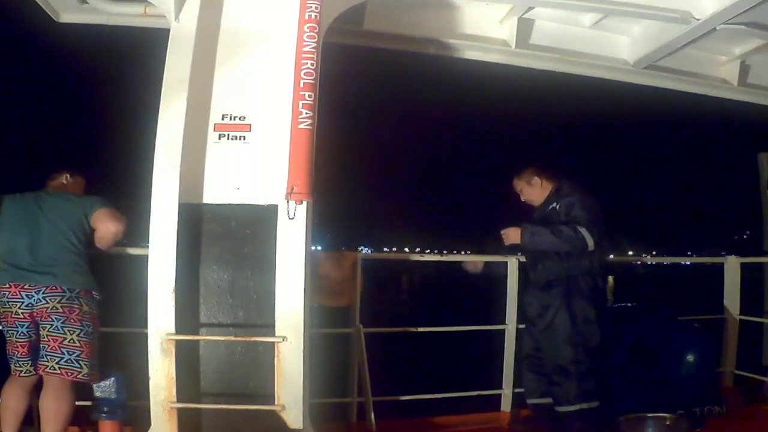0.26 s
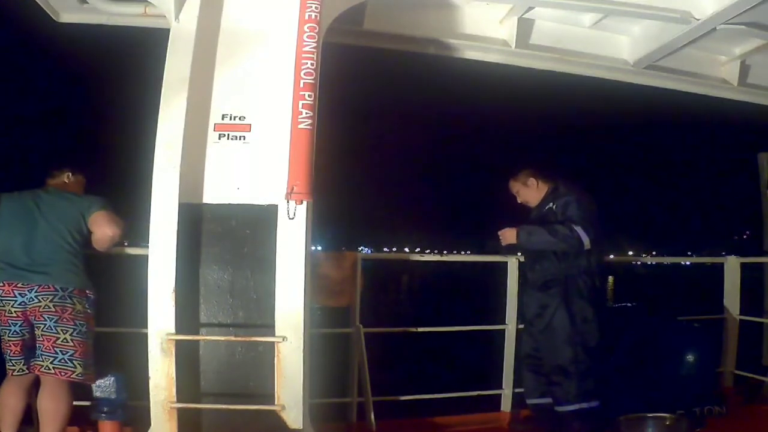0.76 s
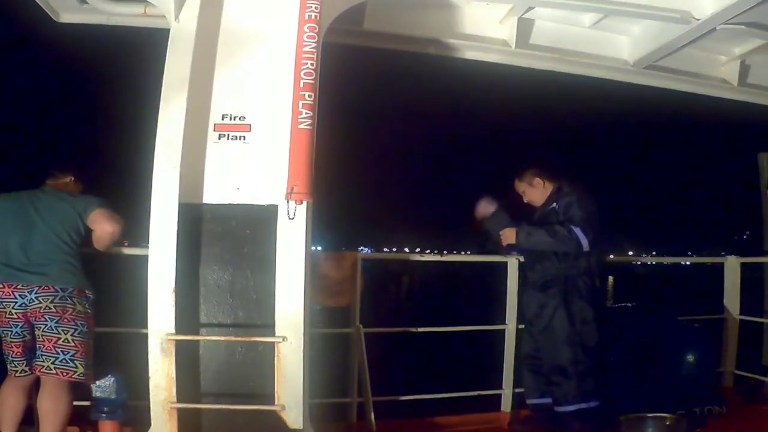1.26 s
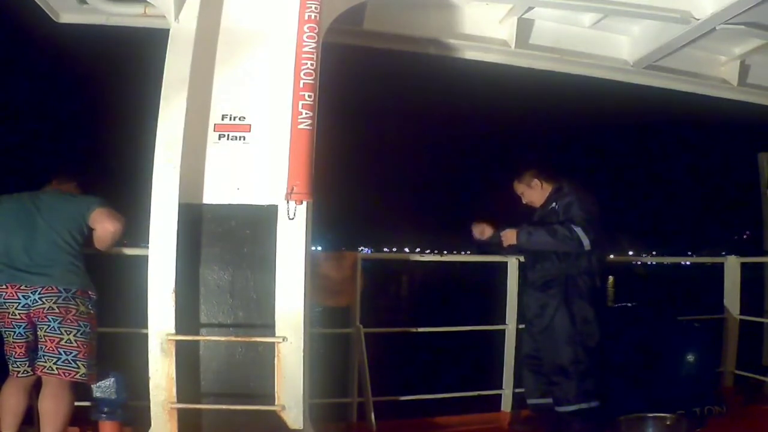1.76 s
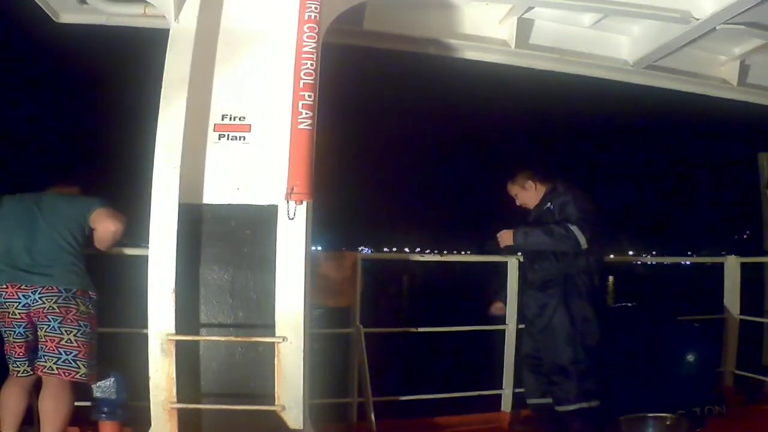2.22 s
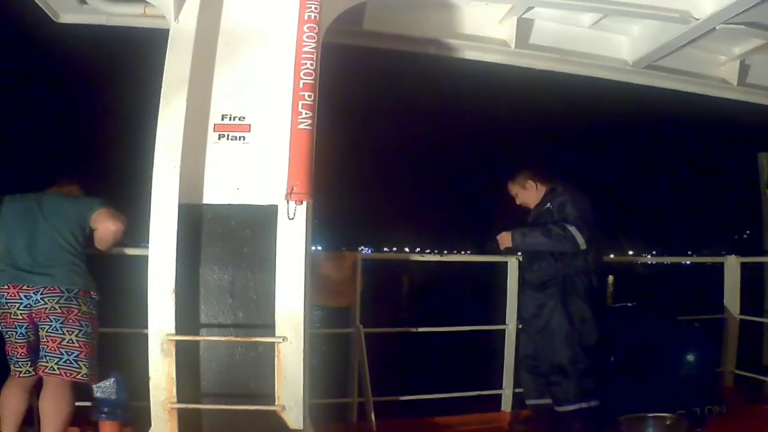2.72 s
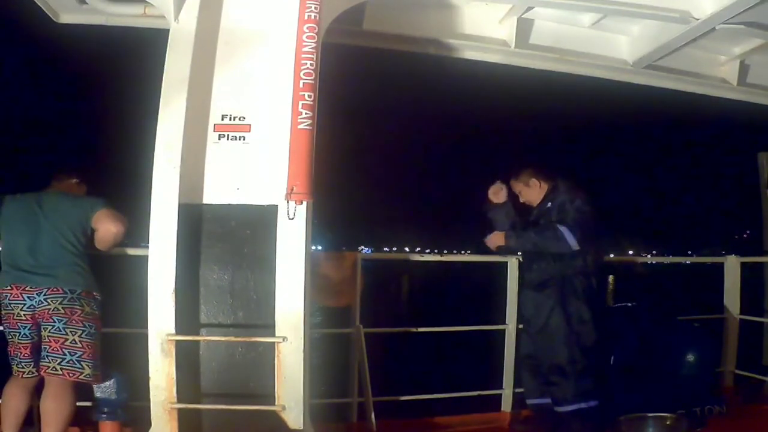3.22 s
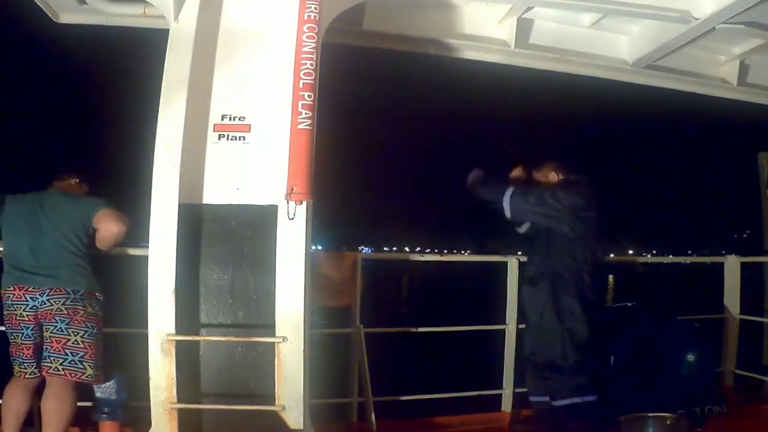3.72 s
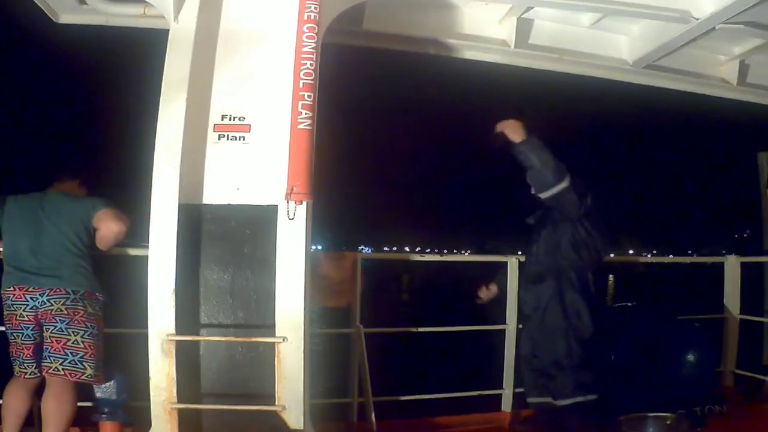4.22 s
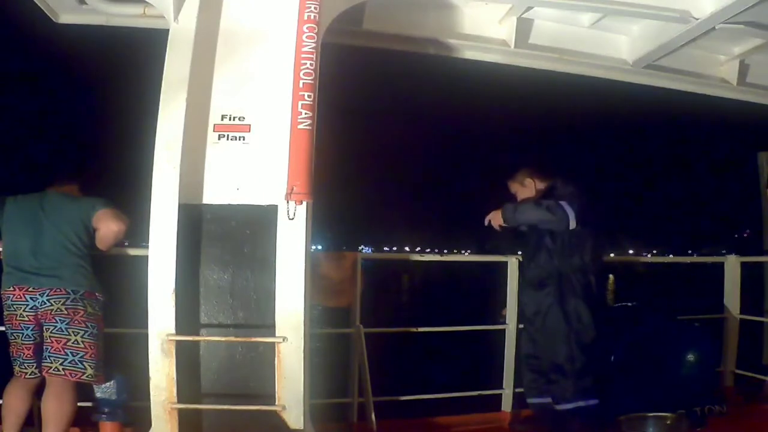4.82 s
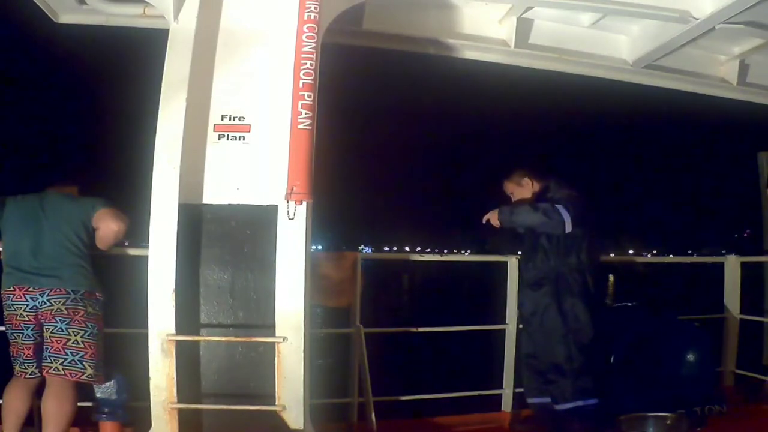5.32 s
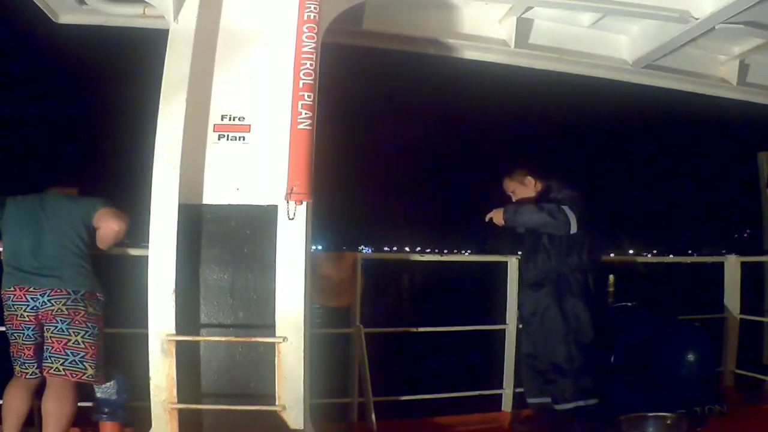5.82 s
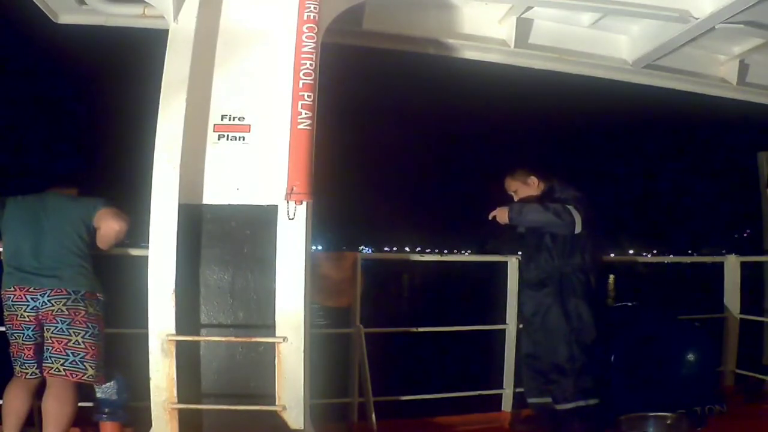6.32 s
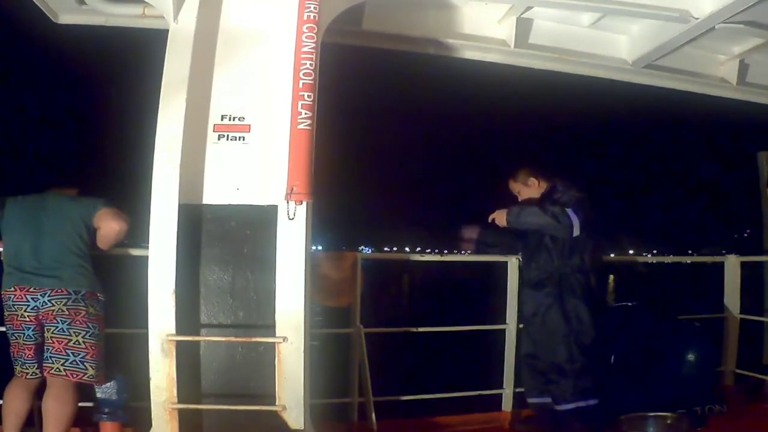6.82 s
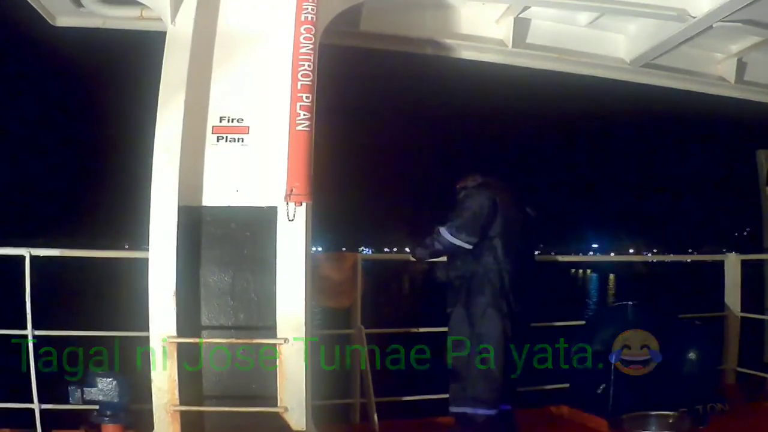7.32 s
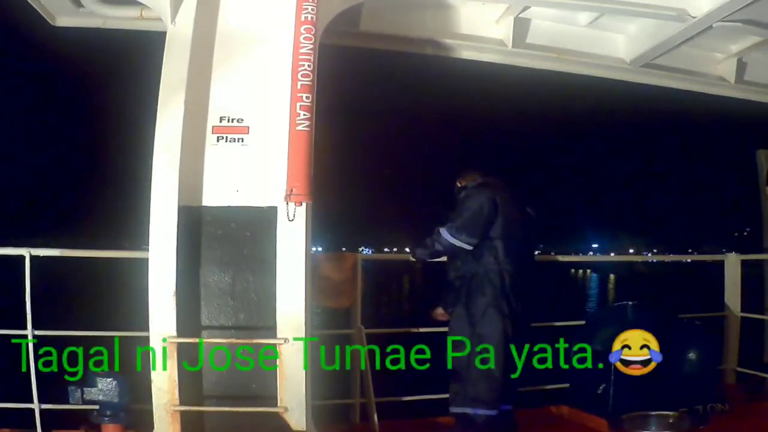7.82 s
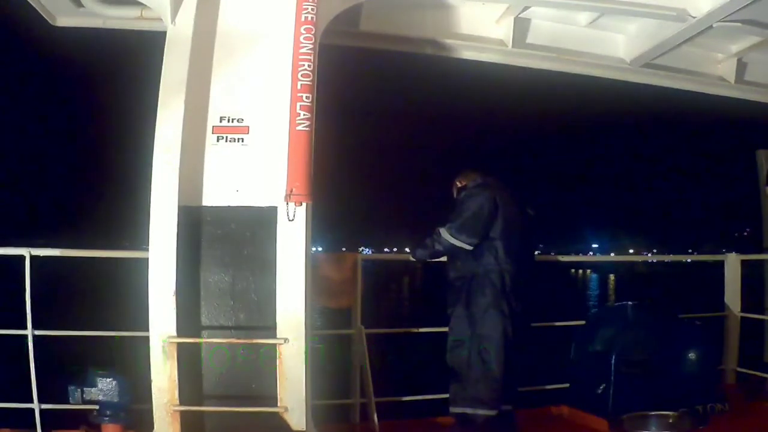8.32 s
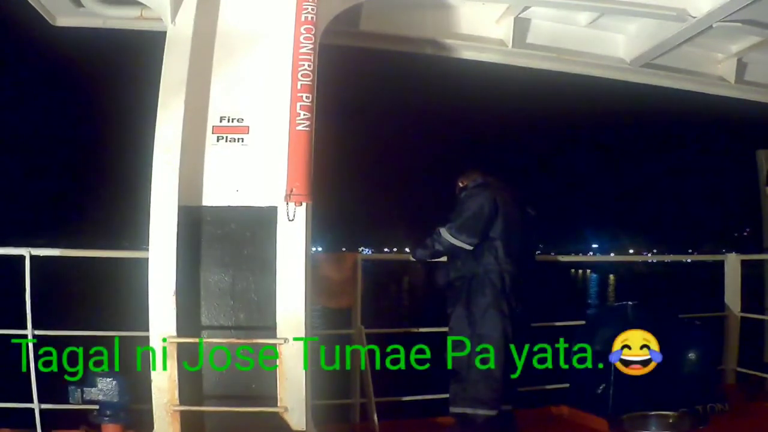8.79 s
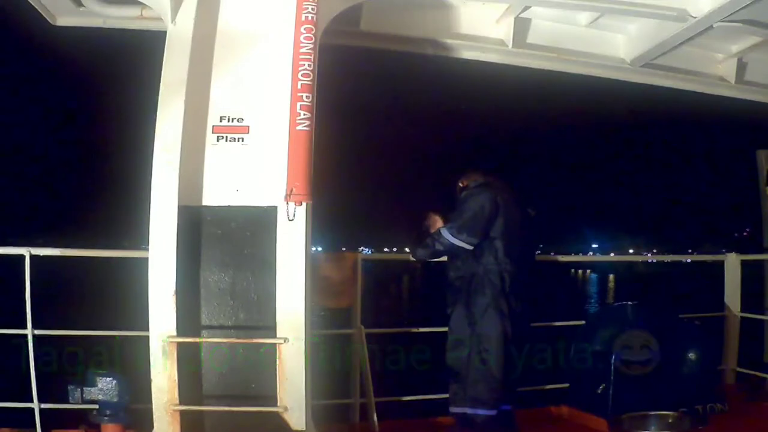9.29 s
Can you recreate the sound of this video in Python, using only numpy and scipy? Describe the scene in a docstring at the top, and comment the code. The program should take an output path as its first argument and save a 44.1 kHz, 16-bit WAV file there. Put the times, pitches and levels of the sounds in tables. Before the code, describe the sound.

Continuous ship machinery heard from a fixed microphone on deck: deep, bassy exhaust drone with a rapid even flutter, resonant hums from steel plates, and a dull ventilation rush. Short soft rattles follow the engine beat, with a few stronger knocks. Faint narrow swishes swell near the start, before three seconds and after eight. Past the middle the rhythm shifts subtly in a smooth blend and the drone becomes marginally louder.

```python
"""A low drone throbs seven or eight times a second: a ship's diesel at about 900 rpm, heard from an
open steel deck in port. Exhaust and casing repeat a cycle built from sine waves; once, their sound
cross-fades and the throb then comes a third of a cycle later.
Other machines hum as steady tones; ventilation roars as shaped noise with a faint whine in it.
A loose fitting rattles in time with the engine as short rings; narrow noise swells a few times,
and one thin, high squeak is heard."""
import sys
import numpy as np
from scipy import signal
from scipy.fft import rfft, irfft, next_fast_len
from scipy.io import wavfile

SR = 44100
rng = np.random.default_rng(int(sys.argv[2]) if len(sys.argv) > 2 else 0)


def digitize_waveform(pressure):
    """Quantize a signal to 16-bit integers and store it at the path in sys.argv[1].

    Rows of a 2-D input are taken as channels; values are limited to [-1, 1].
    """
    field = np.atleast_2d(pressure).T
    bounded = np.clip(field, -1, 1)
    quanta = np.round(bounded * 32767).astype(np.int16)
    wavfile.write(sys.argv[1], SR, quanta)


N = 421155

CYCLE_HZ = 7.4968  # engine cycles per second; the shaft turns twice in each
FIRST_THROB_S = 0.040
EDGE_HZ = 15400  # upper edge of the sound

# Ventilation roar and hiss. Each row: frequency in Hz, level in dB per Hz.
ROAR = [(18.0, -72), (50.0, -69.5), (110.0, -71), (300.0, -73.5), (600.0, -78), (900.0, -79.5),
        (1350.0, -81.5), (1500.0, -85.5), (2200.0, -88.5), (3000.0, -93.5), (3800.0, -91.5), (4600.0, -96),
        (9000.0, -99.3), (12500.0, -99.1), (14000.0, -105.7), (15200.0, -115.0)]
# Resonances of ducts and plates that the roar excites.
# Each row: centre in Hz, width in Hz, level in dB per Hz.
DUCTS = [(55, 3.7, -60), (83, 15, -62.5), (234.6, 13.6, -61), (335, 14, -71), (414, 26, -64.5),
         (409, 23, -61), (472, 14.4, -62.5), (501.6, 13, -62.5), (534.2, 10.5, -60), (727.7, 19, -67.5),
         (997, 27, -73), (1037.7, 14.4, -64), (1089.3, 12.5, -63), (1146, 37, -75), (1270, 58, -74),
         (1341, 6.7, -67), (1380, 5.8, -69), (1423, 32, -76.5), (2430, 38, -86), (2550, 100, -87.5),
         (3240, 96, -86.5), (3750, 140, -91.5)]
# Thin whine of turning machinery. Each row: centre in Hz, width in Hz, level in dB per Hz.
WHINE = [(2397, 12, -80), (3197, 12, -80), (3250, 14, -81), (3274, 18, -78.5), (3460, 14, -81),
         (3580, 14, -85), (3770, 15, -84), (3940, 14, -85.5)]
# The roar surges once: peak time in seconds, rise in seconds, fall in seconds, extra level in dB.
SURGE = (7.198, .09, .09, 4.0)
# Steady hum of other machines. Each row: frequency in Hz, rms level in dB.
HUM = [(19.35, -55), (56.52, -53), (59.1, -39.5), (229.38, -55), (236.19, -52), (266.47, -73),
       (363.79, -62.5), (427.3, -57.5), (525.88, -50.5), (657.44, -61), (1799, -73)]
# Short swells of narrow noise: two in the whine near 2.4 kHz, then higher swishes, perhaps of a
# fishing line. Each row: middle in seconds, length in seconds, centre in Hz, width in Hz,
# rms level in dB at the height of the swell.
SWELLS = [(0.283, .14, 2440, 110, -57), (0.70, .16, 2420, 110, -57), (2.81, .09, 4900, 900, -60),
          (8.29, 0.55, 4450, 200, -63)]
# One thin, high squeak: start in seconds, length in seconds, frequency in Hz, rms level in dB.
SQUEAK = (0.522, .052, 12123, -60)
# Hardest knocks of the loose fitting. Each row: start in seconds, strength in dB
# (before the overall level of the fitting).
HARD_KNOCKS = [(1.6593, -36.5), (1.7933, -32.5), (3.8187, -37), (5.6622, -35.5), (6.0615, -35.5),
               (9.44, -34)]
# What the fitting rings with. Each row: frequency in Hz, relative level in dB,
# time to fade by 60 dB in seconds.
FITTING_MODES = [(1290, 0, 0.014), (1390, -0.5, 0.014), (1700, -3, .015), (2050, -14, 0.014)]
# The engine's sound cross-fades once, and the throb then comes later:
# start in seconds, end in seconds, delay in cycles.
CROSSFADE = (6.85, 7.35, 0.335)
# Even orders (multiples of the cycle rate) of the engine casing, before the clatter joins them.
# Each row: frequency in Hz, rms level in dB.
BLOCK = [(165, -74), (195, -72), (220, -52), (260, -59), (350, -65), (500, -62.5), (600, -73), (1100, -67),
         (1340, -67), (1500, -83)]
# Orders that hit a resonance of the deck plates and sing out, before the clatter joins them.
# Each row: multiple of the cycle rate, rms level in dB.
SINGING = [(27, -50), (31, -43.5), (32, -45), (33, -49), (38, -52.5), (44, -57.5), (48, -56), (52, -52.5),
           (54, -48), (64, -51), (67, -54), (70, -52.5), (82, -58), (114, -58), (144, -65), (178, -57.5)]
# Even orders of the exhaust drone, before its level changes.
# Each row: frequency in Hz, rms level in dB.
DRONE = [(15, -59), (30, -48.7), (45, -43.5), (60, -41.8), (90, -51), (105, -47.5), (120, -51.5),
         (140, -60), (155, -53)]
# The two strongest orders of the drone, whose beat is the throb, before its level changes.
# Each row: multiple of the cycle rate, rms level in dB.
THROB = [(10, -34.3), (11, -32)]
# Main resonance of the exhaust pipe: centre in Hz, width in Hz.
PIPE = (72, 90)
# The drone is about 1 dB louder after the cross-fade: start in seconds, end in seconds,
# level change in dB before, level change in dB after.
DRONE_RISE = (7.3, 8.2, -0.2, 1.1)


def gain_of(db):
    """Turns decibels into amplitude."""
    return 10 ** (np.asarray(db) / 20)


def evened(x):
    """Scales a sound to an rms (average strength) of one."""
    return x / np.sqrt(np.mean(x ** 2) + 1e-20)


def add(mix, s, sound):
    """Mixes a sound in, starting at s seconds."""
    part = mix[max(round(s * SR), 0):][:len(sound)]
    part += sound[:len(part)]


def noise(density):
    """Makes noise whose power per Hz follows the function density(hz)."""
    size = next_fast_len(N)
    hz = np.fft.rfftfreq(size, 1 / SR)
    spectrum = rfft(rng.standard_normal(size))
    return irfft(spectrum * np.sqrt(density(hz) * SR / 2), size)[:N]


def drift(rate_hz):
    """Wanders by chance, mostly slower than rate_hz, with an rms of one."""
    return evened(noise(lambda hz: np.exp(-(hz / rate_hz) ** 2)))


def read(points, hz):
    """Reads a level in dB from points joined by straight lines over the log of frequency."""
    f, db = np.transpose(points)
    return np.interp(np.log(hz + 1), np.log(f + 1), db)


def resonance(hz, centre, width):
    """Power of a steep resonance, halved at the edges of its width."""
    return 1 / (1 + (np.sqrt(2) - 1) * (2 * (hz - centre) / width) ** 2) ** 2


def deck_power(hz):
    """Power per Hz on deck: a broad slope with ducts, plates and whine standing out of it."""
    power = gain_of(read(ROAR, hz)) ** 2
    for centre, width, db in DUCTS + WHINE:
        power = power + gain_of(db) ** 2 * resonance(hz, centre, width)
    return power


def order_levels(orders, slope, odd_db, resonant):
    """The shaft turns twice a cycle, so odd orders are weaker; listed ones have their own level."""
    db = read(slope, orders * CYCLE_HZ) + odd_db * (orders % 2)
    own = {round(order): level for order, level in resonant}
    return np.array([own.get(order, level) for order, level in zip(orders, db)])


def one_cycle(orders, db, lag, size=16384):
    """Adds up one engine cycle from its orders, each delayed by lag in turns of its own wave."""
    lines = np.zeros(size // 2 + 1, complex)
    lines[np.round(orders).astype(int)] = gain_of(db) * np.exp(-2j * np.pi * lag)
    return irfft(lines) * size / np.sqrt(2)


def repeat(cycle, turns):
    """Plays a cycle over and over; once, the beat cross-fades into a later one."""
    start, end, delay = CROSSFADE
    fade = np.pi / 2 * np.clip((np.arange(N) / SR - start) / (end - start), 0, 1)
    place = np.linspace(0, 1, len(cycle), endpoint=False)
    before = np.interp(turns % 1, place, cycle)
    after = np.interp((turns - delay) % 1, place, cycle)
    return np.cos(fade) * before + np.sin(fade) * after


def ventilation(t, flutter_db=0.43):
    """Air rushes through the resonances of the ship, with one brief surge."""
    s, rise, fall, db = SURGE
    surge_db = np.interp(t, [s - rise, s, s + fall], [0, db, 0])
    return noise(deck_power) * gain_of(surge_db + flutter_db * drift(10.0))


def hum(t, waver_rad=0.2):
    """Pumps and fans at their own speeds beat slowly against the engine."""
    out = np.zeros(N)
    for hz, db in HUM:
        phase = 2 * np.pi * (hz * t + rng.random()) + waver_rad * drift(0.53)
        out += np.sqrt(2) * gain_of(db) * np.cos(phase)
    return out


def noise_swells(t):
    """Narrow bands of noise swell and fade: two in the whine, then higher swishes."""
    out = np.zeros(N)
    for s, length, centre, width, db in SWELLS:
        swell = np.cos(np.pi * np.clip((t - s) / length, -.5, .5))
        hiss = evened(noise(lambda hz: resonance(hz, centre, width)))
        out += gain_of(db) * swell * hiss
    return out


def squeak(t, edge_s=.005):
    """A faint, pure tone starts and stops quickly."""
    s, length, hz, db = SQUEAK
    gate = np.clip(np.minimum(t - s, s + length - t) / edge_s, 0, 1)
    return np.sqrt(2) * gain_of(db) * gate * np.sin(2 * np.pi * hz * t)


def rattle(delay_s=0.0175, typical_db=-44, spread_db=3):
    """The engine shakes the fitting just after each throb, with chance strength in dB."""
    start, end, delay = CROSSFADE
    times = np.arange(FIRST_THROB_S + delay_s, N / SR, 1 / CYCLE_HZ)
    # from the middle of the cross-fade the knocks come later, like the throb
    times = times + (times > (start + end) / 2) * delay / CYCLE_HZ
    return list(zip(times, typical_db + spread_db * rng.standard_normal(len(times))))


def fitting(level_db=-1.5, rise_s=0.0009):
    """Each knock briefly rings the modes of a small, damped piece of metal."""
    out, t = np.zeros(N), np.arange(SR // 10) / SR
    for s, knock_db in rattle() + HARD_KNOCKS:
        ring = np.zeros(len(t))
        for hz, db, t60 in FITTING_MODES:
            ring += gain_of(db - 60 * t / t60) * np.sin(2 * np.pi * (hz * t + rng.random()))
        ring *= 1 - np.exp(-t / rise_s)  # soft start
        add(out, s, gain_of(knock_db + level_db) * np.sqrt(2) * ring / abs(ring).max())
    return out


def casing(turns, unsteady_db=0.8, clatter_db=-2.0, odd_db=-2.0, uneven_db=1.5):
    """Strong block orders join uneven valve-gear ones; many paths through the ship unalign them."""
    orders = np.arange(22, 520)
    block = gain_of(order_levels(orders, BLOCK, odd_db, SINGING))
    chance_db = uneven_db * rng.standard_normal(len(orders))
    clatter = np.sqrt(deck_power(orders * CYCLE_HZ)) * gain_of(clatter_db + chance_db)
    both_db = 20 * np.log10(np.hypot(block, clatter))
    cycle = one_cycle(orders, both_db, rng.random(len(orders)))
    return repeat(cycle, turns) * gain_of(unsteady_db * drift(3.8))


def exhaust(t, turns, unsteady_db=0.36, odd_db=-10, scatter_per_octave=0.22):
    """Orders near the pipe's resonance align once a cycle and throb; those further off scatter."""
    orders = np.arange(2, 22)
    centre, width = PIPE
    hz = orders * CYCLE_HZ
    lag = np.arctan(2 * (hz - centre) / width) / np.pi  # the pipe rings on a little after each throb
    # scatter in turns, growing with distance from the resonance
    lag += scatter_per_octave * np.log2(hz / centre) * rng.standard_normal(len(orders))
    cycle = one_cycle(orders, order_levels(orders, DRONE, odd_db, THROB), lag)
    rise_db = np.interp(t, DRONE_RISE[:2], DRONE_RISE[2:])
    return repeat(cycle, turns) * gain_of(rise_db + unsteady_db * drift(0.75))


def scene(hunting_s=.00005):
    """The governor holds the speed almost exactly; all sounds add up at one listening point."""
    t = np.arange(N) / SR
    turns = CYCLE_HZ * (t - FIRST_THROB_S + hunting_s * drift(0.8))
    background = ventilation(t) + hum(t) + noise_swells(t) + squeak(t)
    engine = fitting() + casing(turns) + exhaust(t, turns)
    return (background + engine)[None]


def record(dry):
    """A steep low-pass filter takes away the highest treble."""
    low_pass = signal.firwin(511, EDGE_HZ, window=("kaiser", 9), fs=SR)
    return signal.oaconvolve(dry, low_pass[None], "same")


dry = scene()
out = record(dry)
digitize_waveform(out)
```